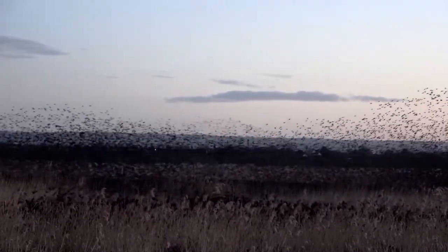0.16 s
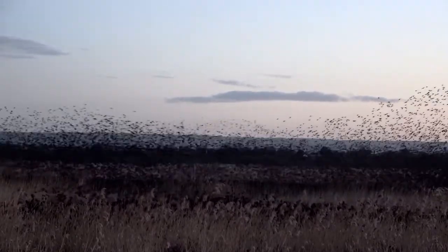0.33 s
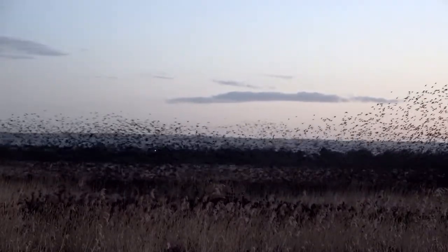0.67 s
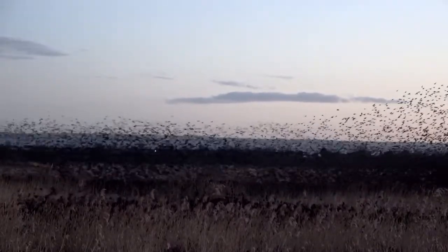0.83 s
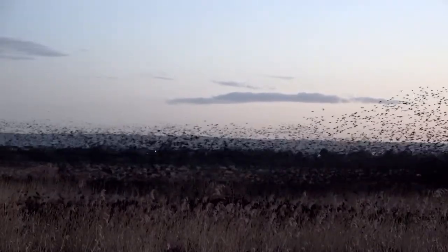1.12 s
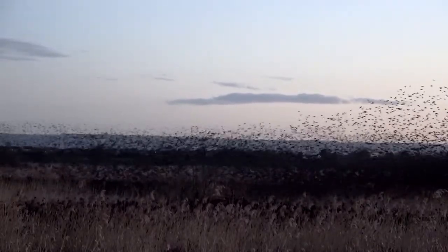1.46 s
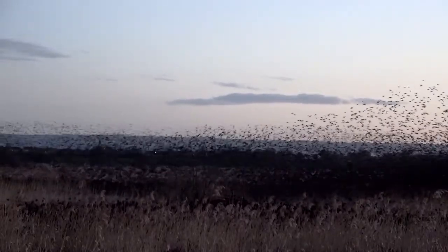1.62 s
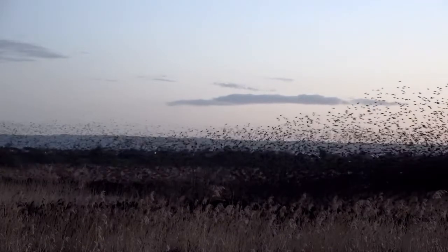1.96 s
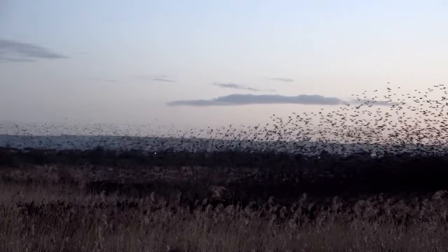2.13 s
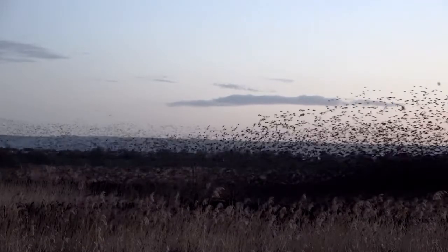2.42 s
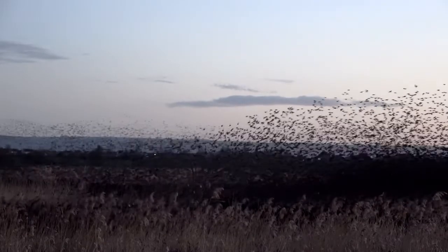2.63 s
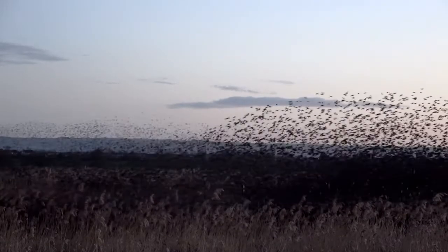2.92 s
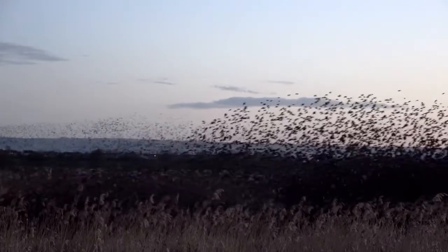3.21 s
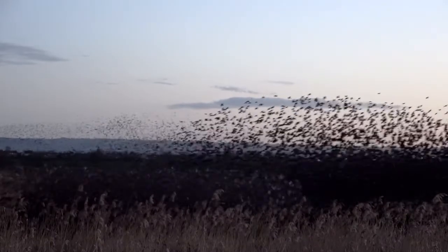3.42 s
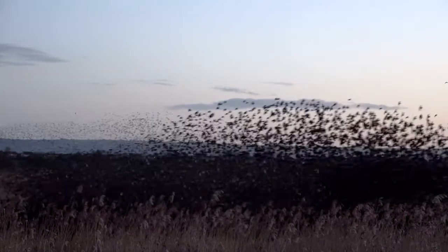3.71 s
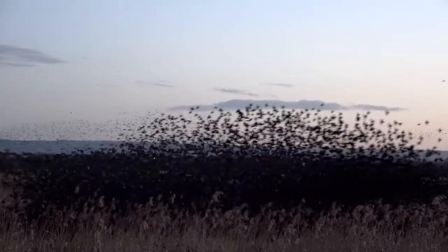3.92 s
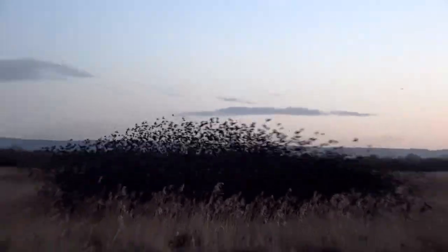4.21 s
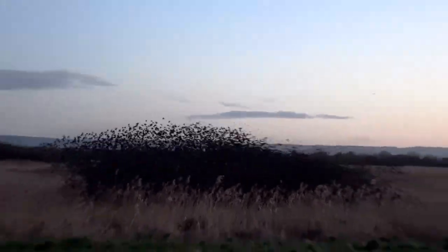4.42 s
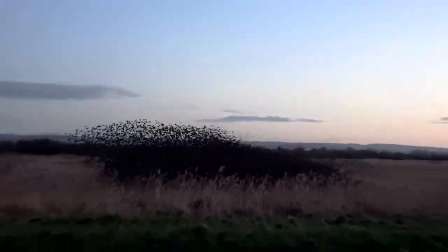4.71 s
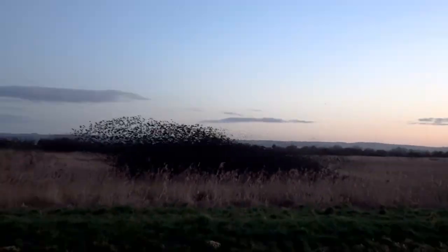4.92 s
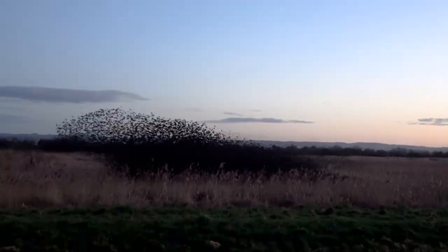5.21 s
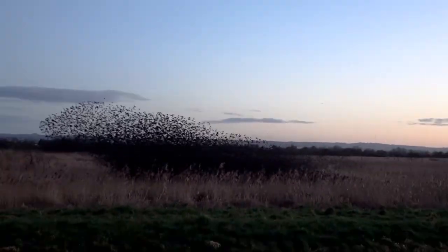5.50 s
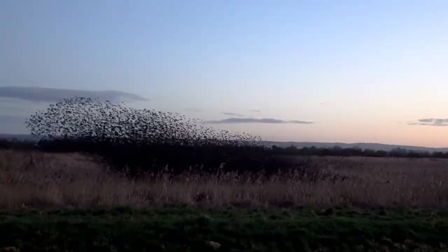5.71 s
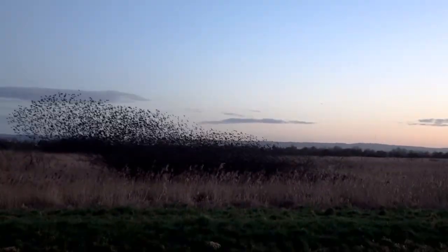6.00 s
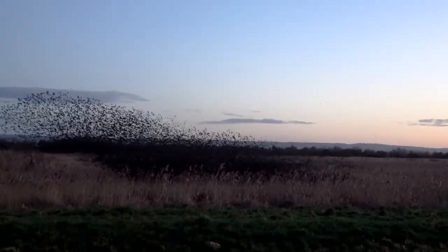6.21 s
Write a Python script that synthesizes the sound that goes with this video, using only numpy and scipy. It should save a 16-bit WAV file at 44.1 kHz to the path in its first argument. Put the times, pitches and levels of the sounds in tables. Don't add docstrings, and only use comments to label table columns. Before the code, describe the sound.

Outdoors at a reedbed at dawn, thousands of starlings chatter as one dense, bright hiss of whistles and churrs. Few single peeps and rough chirps poke out faintly. From about two seconds the wing rush swells, stays full, then eases slightly. Low wind buffets a small camera microphone some way off, its treble slightly grainy.

```python
import sys
import numpy as np
from scipy import signal
from scipy.fft import rfft, irfft
from scipy.io import wavfile
from scipy.ndimage import uniform_filter1d

SR = 44100
rng = np.random.default_rng(int(sys.argv[2]) if len(sys.argv) > 2 else 0)


def dump(signal):
    limited = np.clip(np.atleast_2d(signal).T, -1, 1)
    pcm = np.round(limited * 32767).astype(np.int16)
    wavfile.write(sys.argv[1], SR, pcm)


def boost(x):
    u = np.asarray(x, float) / 20
    return 10 ** u


N = 280476

# (frequency [Hz], density [dB per Hz])
CHATTER_SPECTRUM = [(900, -16.5), (1300, -14), (1800, -7.5), (2400, -3.5), (2750, -1), (3050, -0.8),
                    (3280, -2), (3550, -8), (3900, -15), (4500, -26)]
# (frequency [Hz], density [dB per Hz])
SHRILL_SPECTRUM = [(3000, -10.5), (3800, -1.5), (5300, -1.5), (6500, -3.5), (7600, -6.5), (8500, -8.5),
                   (9100, -15.5), (9800, -44), (11000, -66)]
# (frequency [Hz], density [dB per Hz])
SWISH_SPECTRUM = [(120, -30), (190, -3), (250, 2.5), (450, -2), (900, -0.4), (1800, -4.5), (3500, -8),
                  (7000, -12), (10000, -29.5)]
# (frequency [Hz], density [dB per Hz])
FEATHER_SPECTRUM = [(7000, -19), (9500, 1), (10300, -1.5), (11500, -3), (12800, -4), (14300, -8.5),
                    (15600, -8)]
# (frequency [Hz], density [dB per Hz])
WIND_SPECTRUM = [(3, 8), (12, -18), (20, 9), (30, 1.5), (44, 7), (56, 0), (75, 5)]
# (frequency [Hz], density [dB per Hz])
THRUM_SPECTRUM = [(42, -11), (58, -5.5), (75, -2), (95, -7), (130, -13), (165, -22), (195, -27.5)]
# (frequency [Hz], gain [dB])
FOAM_GAIN = [(2, -2.5), (170, 2.5), (230, -12.5), (330, -40)]
# (frequency [Hz], step [dB])
TREBLE_STEP = [(8600, -22), (9300, 5.5), (9950, 6.5), (10250, 10.5), (10500, 6), (14000, 6.5), (14600, 9.5),
               (15000, 7)]
# (time [s], level [dB])
WING_EFFORT = [(0, 0), (.6, 0), (1.35, -0.8), (1.7, 1.5), (2.05, 4.5), (2.4, 6), (3.1, 5), (4.1, 7.5),
               (4.6, 6.5), (5.3, 5), (6.36, 3)]
# (time [s], level [dB])
WIND_GUSTS = [(0, 6.5), (.45, 4.5), (.57, 2), (.64, 5.5), (.82, 3), (1.27, -6), (1.5, -2), (1.82, -2),
              (1.96, 7), (2.31, 1), (2.46, 1), (2.89, -1), (3.18, 3), (3.31, 5), (3.44, -8), (3.6, 3.5),
              (3.81, -3), (3.93, -1), (4.05, 4), (4.7, -10), (4.94, 6), (5.15, -2), (5.4, 3.5), (6.0, -6),
              (6.29, 4.5)]
# (time [s], level [dB])
THRUM_SURGES = [(.47, 6), (1.18, 4.5), (1.57, 3), (1.8, 4.5), (2.32, 4), (2.61, 2.5), (2.83, 4), (3.23, 7),
                (4.24, 2), (4.41, 5), (4.56, 4.5), (5.07, 2), (5.14, -4), (5.34, 1.5), (5.43, 4),
                (5.52, 2.5), (5.71, 1), (6.31, 2.5)]
# (time [s], length [s], first pitch [Hz], level [dB])
SEEP_CALLS = [(1.38, .31, 7800, -46), (2.115, .2, 8000, -41), (2.86, .21, 7550, -40)]
# (time [s], first pitch [Hz], last pitch [Hz], level [dB])
PEEP_CALLS = [(1.05, 9000, 8650, -43), (1.33, 7760, 7550, -38), (1.48, 8900, 9150, -46),
              (2.01, 8900, 8850, -40), (3.105, 9000, 8600, -47), (3.15, 7700, 7500, -38),
              (3.73, 8200, 8450, -42), (3.95, 6140, 6050, -38), (4.06, 8250, 8500, -38),
              (4.57, 8750, 8960, -42), (4.67, 8750, 8650, -39.5), (4.75, 9400, 9300, -44),
              (5.0, 9400, 9250, -46), (5.23, 6900, 6750, -33.5), (5.84, 8950, 9150, -48)]
# (time [s], length [s], first pitch [Hz], last pitch [Hz], level [dB])
CHURR_CALLS = [(.36, .06, 3650, 3800, -33), (.39, .04, 4350, 4500, -33), (.58, .11, 7800, 7300, -42),
               (.67, .05, 6200, 5900, -39), (.92, .12, 6100, 4700, -35), (1.11, .05, 5550, 5860, -38),
               (1.96, .067, 4450, 4570, -35), (3.065, .05, 8500, 7700, -41), (4.17, .05, 5400, 5370, -34),
               (4.99, .053, 5950, 5600, -35), (6.04, .04, 4800, 4300, -34), (6.12, .11, 4670, 5340, -36)]

CHATTER_DB, CHATTER_FADE_DB_PER_S = -19, -.22
SHRILL_DB, SHRILL_FADE_DB_PER_S = -25.5, -.23
SEEP_LAST_HZ, PEEP_LENGTH_S = 8520, .058
SEEP_BUZZ, PEEP_BUZZ, CHURR_BUZZ = .03, .16, .6
SWISH_DB, FEATHER_DB, THRUM_DB, WIND_DB = -29.5, -50.5, -23.5, -23.5
FEATHER_SHARE, THRUM_SHARE, WIND_SHARE = .63, .87, .5
GUST_WIDTH_S, SURGE_WIDTH_S = .045, .03
LONG_PER_S, LONG_SHORTEST_S, LONG_MORE_S = 5, .02, .027


def evened(x):
    return x / np.sqrt(np.mean(x ** 2) + 1e-20)


def colour(x, spectrum):
    f, db = np.transpose(spectrum)
    hz = np.fft.rfftfreq(N, 1 / SR)
    gain_db = np.interp(np.log(hz + 1), np.log(f + 1), db, left=-90, right=-90)
    return evened(irfft(rfft(x) * boost(gain_db), N))


def add(mix, start_s, sound):
    part = mix[round(start_s * SR):][:len(sound)]
    part += sound[:len(part)]


def call(length_s, first_hz, last_hz, buzz, buzz_hz, phase):
    u = np.linspace(0, 1, max(round(length_s * SR), 64))
    shake = np.sin(2 * np.pi * (buzz_hz * u * length_s + phase))
    glide_hz = (last_hz - first_hz) * (1 - (1 - u) ** 2.3)
    hz = first_hz + glide_hz + 420 * buzz * shake
    tone = np.sin(2 * np.pi * (np.cumsum(hz) / SR + phase))
    envelope = np.sin(np.pi * u) ** .2
    return 1.87 * tone * (1 + buzz * shake) * envelope


def crowd(spectrum, count, spread_db, blur):
    low_hz, high_hz = spectrum[0][0], spectrum[-1][0]
    out = np.zeros(N + SR)
    for when, long, pitch, glide, buzz, rate, size in rng.random((count, 7)):
        first_hz = low_hz + pitch * (high_hz - low_hz)
        last_hz = first_hz + 1300 * (glide - .5)
        length_s = .01498 + .15 * long ** 3
        sound = call(length_s, first_hz, last_hz, buzz ** 2, 60 + 180 * rate, size)
        level_db = -spread_db * np.log(1 - .98 * size)
        add(out, when * (N / SR + .25), boost(level_db) * sound)
    distinct = evened(out[SR // 4:][:N])
    far = rng.standard_normal(N)
    return colour(np.sqrt(1 - blur) * distinct + np.sqrt(blur) * far, spectrum)


def roost():
    t = np.arange(N) / SR
    chatter = crowd(CHATTER_SPECTRUM, count=2000, spread_db=2.5, blur=.93)
    shrill = crowd(SHRILL_SPECTRUM, count=2600, spread_db=2, blur=.87)
    chatter_db = CHATTER_DB + CHATTER_FADE_DB_PER_S * t
    shrill_db = SHRILL_DB + SHRILL_FADE_DB_PER_S * t
    return boost(chatter_db) * chatter + boost(shrill_db) * shrill


def flutter(strokes_per_s, spread_db):
    strokes = boost(spread_db * rng.random(N)) * (rng.random(N) < strokes_per_s / SR)
    power = signal.oaconvolve(strokes ** 2, np.hanning(1300), "same")
    return np.sqrt(power.clip(0) + 1e-9)


def wing_effort_db():
    s, db = np.transpose(WING_EFFORT)
    return np.interp(np.arange(N) / SR, s, db)


def wings():
    effort_db = wing_effort_db()
    swish = colour(flutter(2500, spread_db=18) * rng.standard_normal(N), SWISH_SPECTRUM)
    feather = colour(flutter(2500, spread_db=2) * rng.standard_normal(N), FEATHER_SPECTRUM)
    feather_db = FEATHER_DB + FEATHER_SHARE * effort_db
    return boost(SWISH_DB + effort_db) * swish + boost(feather_db) * feather


def bumps(rows, width_s):
    t = np.arange(N) / SR
    return sum(db * np.exp(-((t - s) / width_s) ** 2) for s, db in rows)


def capsule_rumble(spectrum):
    limited = np.tanh(.8 * colour(rng.standard_normal(N), spectrum))
    return colour(limited, FOAM_GAIN)


def wind():
    level_db = WIND_DB + WIND_SHARE * wing_effort_db() + bumps(WIND_GUSTS, GUST_WIDTH_S)
    return boost(level_db) * capsule_rumble(WIND_SPECTRUM)


def thrum():
    level_db = THRUM_DB + THRUM_SHARE * wing_effort_db() + bumps(THRUM_SURGES, SURGE_WIDTH_S)
    return boost(level_db) * capsule_rumble(THRUM_SPECTRUM)


def near_calls():
    calls = [(s, length_s, hz, SEEP_LAST_HZ, db, SEEP_BUZZ) for s, length_s, hz, db in SEEP_CALLS]
    calls += [(s, PEEP_LENGTH_S, *rest, PEEP_BUZZ) for s, *rest in PEEP_CALLS]
    calls += [(*row, CHURR_BUZZ) for row in CHURR_CALLS]
    near = np.zeros(N)
    for s, length_s, first_hz, last_hz, db, buzz in calls:
        rate, phase = rng.random(2)
        add(near, s, boost(db) * call(length_s, first_hz, last_hz, buzz, 90 + 90 * rate, phase))
    twinkle = evened(signal.oaconvolve(rng.standard_normal(N), np.hanning(500), "same"))
    return near * (.85 + .4 * twinkle)


def scene():
    return (roost() + wings() + wind() + thrum() + near_calls())[None]


def rounded(x, size, coarser_db):
    n, k = np.arange(2 * size), np.arange(size)
    basis = np.cos(np.pi / size * np.outer(n + .5 + size / 2, k + .5)) * np.sqrt(2 / size)
    basis *= signal.windows.kaiser_bessel_derived(2 * size, 4 * np.pi)[:, None]
    lead = 2048 - 1016
    halves = np.pad(x, (lead, -(N + lead) % size + size)).reshape(-1, size)
    lines = np.hstack([halves[:-1], halves[1:]]) @ basis
    f, db = np.transpose(TREBLE_STEP)
    step = boost(np.interp((k + .5) * SR / (2 * size), f, db + coarser_db, left=-90))
    usual = uniform_filter1d(lines ** 2, size=20000 // size, axis=0)
    usual = uniform_filter1d(usual, size=1 + size // 32, axis=1)
    step = step * np.sqrt(abs(usual) + 1e-20)
    lines = np.sign(lines) * np.floor(abs(lines) / step + .4) * step
    blocks = lines @ basis.T
    return (blocks[1:, :size] + blocks[:-1, size:]).ravel()[lead - size:][:N]


def grainy_treble(x):
    long = np.zeros(N)
    for slot in range(round(LONG_PER_S * N / SR)):
        place, more = rng.random(2)
        length_s = LONG_SHORTEST_S - LONG_MORE_S * np.log(1 - .95 * more)
        add(long, (slot + place) / LONG_PER_S, np.ones(round((length_s + .024) * SR)))
    long = uniform_filter1d(long.clip(0, 1), 256)
    return long * rounded(x, 1024, 1.8) + (1 - long) * rounded(x, 128, 0)


def roll_off(x):
    return signal.sosfilt(signal.butter(12, 15650, fs=SR, output="sos"), x)


def record(dry):
    x = 1.791 * np.tanh(dry[0] / 1.813)
    mix = grainy_treble(x)[None]
    return roll_off(mix)


dry = scene()
out = record(dry)
dump(out)
```